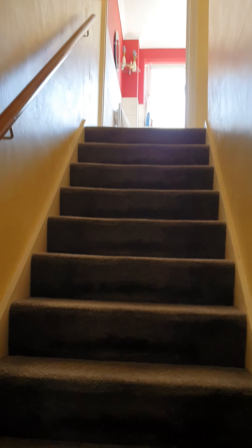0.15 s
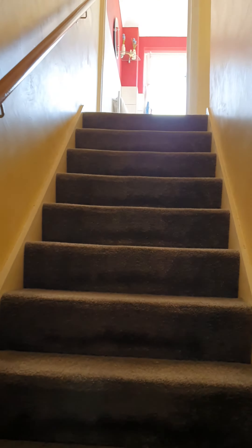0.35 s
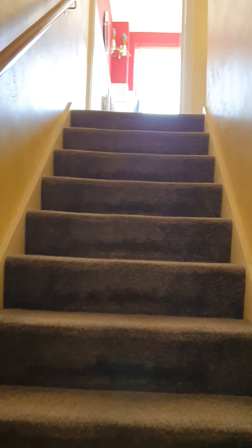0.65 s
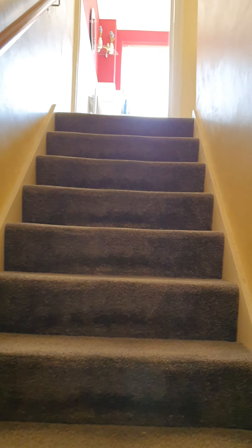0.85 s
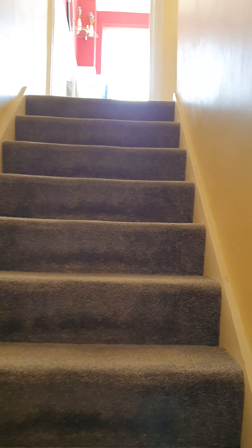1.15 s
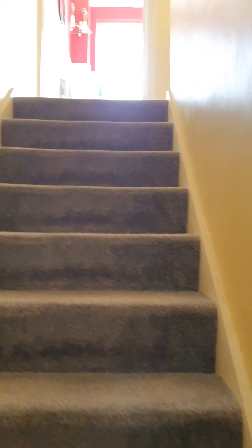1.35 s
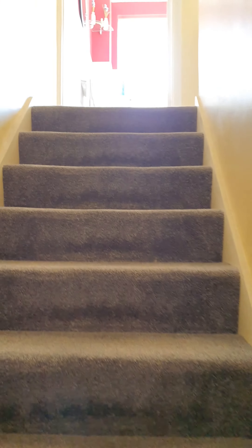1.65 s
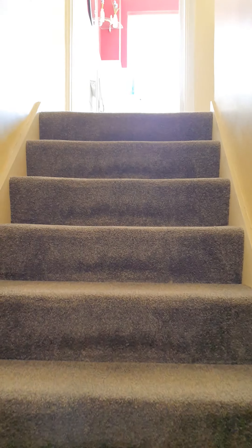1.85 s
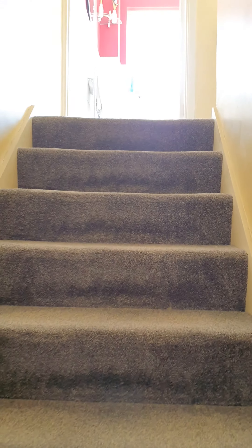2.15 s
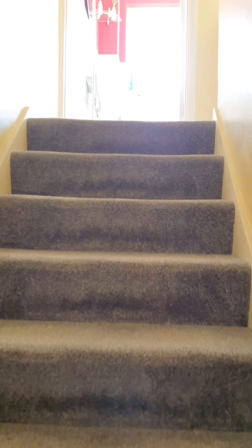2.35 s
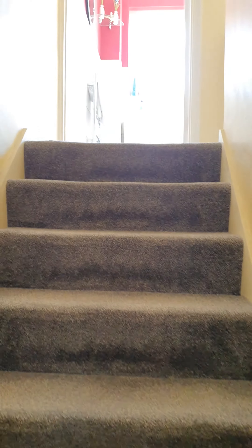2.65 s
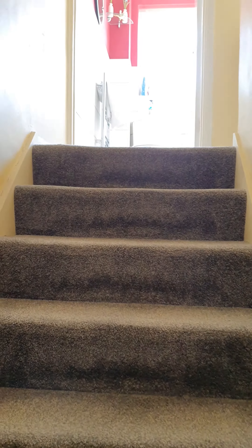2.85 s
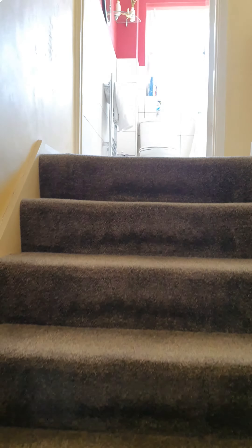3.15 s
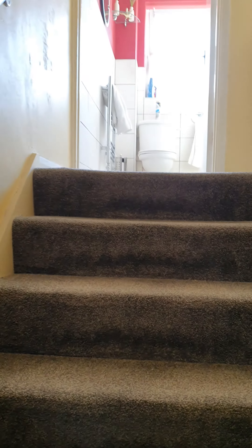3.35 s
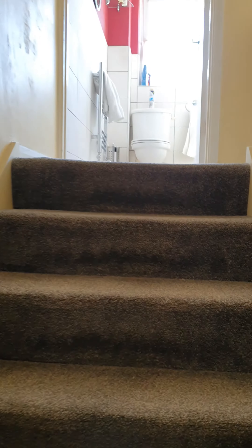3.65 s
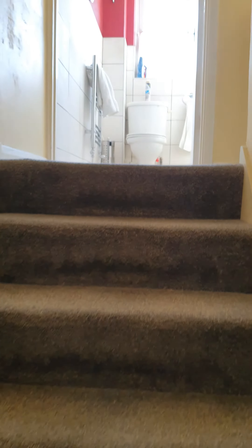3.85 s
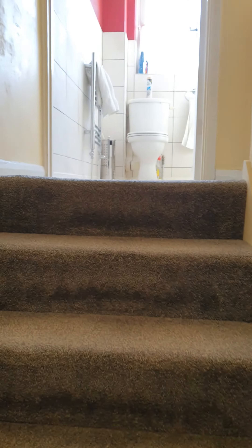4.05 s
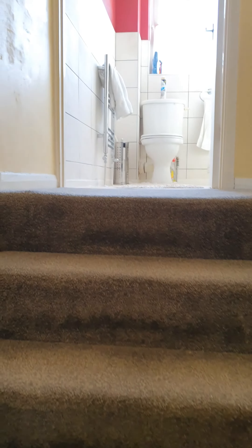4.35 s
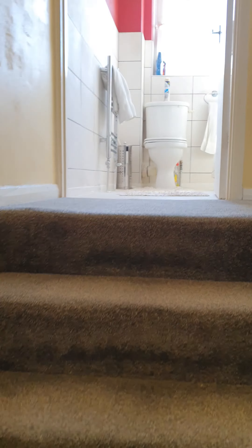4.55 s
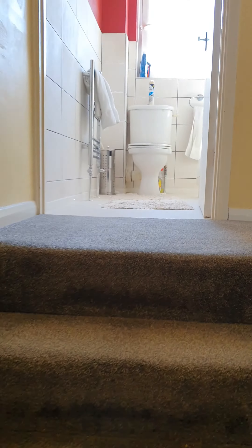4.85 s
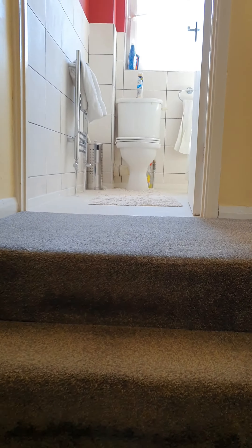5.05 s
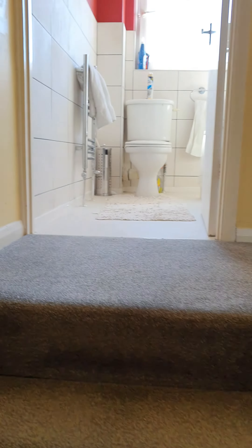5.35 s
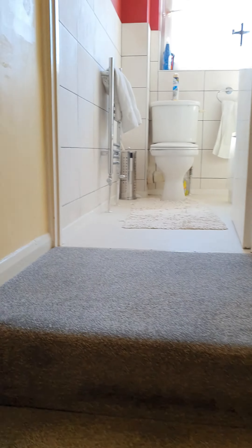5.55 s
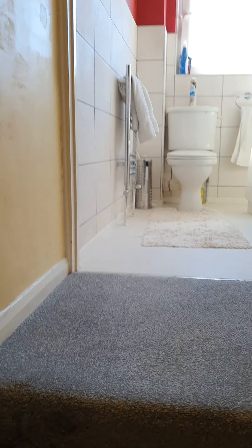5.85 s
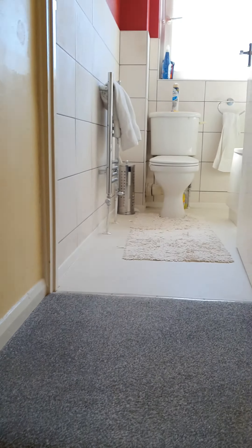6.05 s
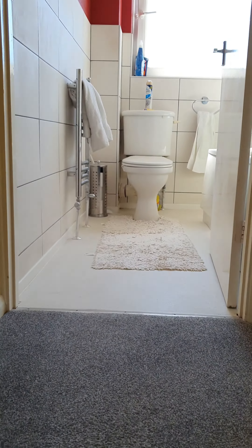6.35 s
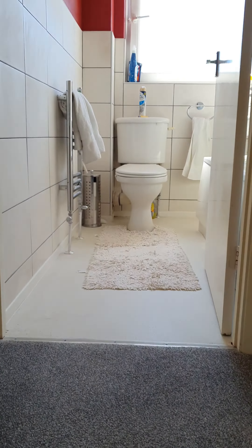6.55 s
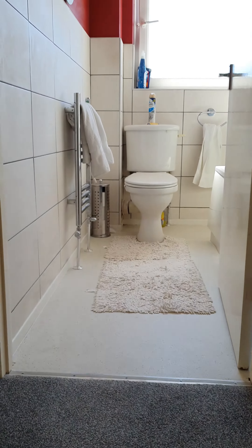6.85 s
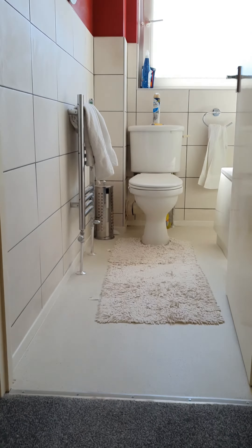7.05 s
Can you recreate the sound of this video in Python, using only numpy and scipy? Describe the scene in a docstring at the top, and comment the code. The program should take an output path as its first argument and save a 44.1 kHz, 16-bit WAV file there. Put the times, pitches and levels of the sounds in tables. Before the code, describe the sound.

Footsteps climb a carpeted wooden staircase, heard close from a microphone in the climber's hand, over the faint hush of a house. After a very soft step at about 0.3 seconds, the woodwork gives a quick crackling creak around 1 second. Dull, booming thuds then follow roughly every 0.6 to 0.7 seconds, often as a double knock of toe and heel on a hollow tread. They fall near 1.1, 1.8, 2.3, 3, 3.7, 4.4, 5.2, 5.7, 6.3 and 7 seconds, the heaviest at 3.7. Small handling bumps and clicks come between 1 and 3 seconds. Wooden joints tick now and then, with sharper cracks near 3.5, 5.2 and 6.4 seconds. A sole briefly scuffs the carpet at about 5 seconds and again at 6. The narrow stairwell adds a short echo, and clothes rustle faintly underneath.

```python
"""Climbing carpeted wooden stairs

A narrow stairwell, heard in stereo from a phone in the climber's hand. Underfoot, body weight
booms in the low modes of the stairs, toes and heels knock the treads, joints tick, and soles scuff
and rub the pile. Small clicks and jolts come from the grip, right at the microphones.
The walls give a short echo, and the hush of the house lies under it all."""
import sys
import numpy as np
from scipy import signal
from scipy.fft import rfft, irfft
from scipy.io import wavfile
from scipy.ndimage import uniform_filter1d

SR = 44100
rng = np.random.default_rng(int(sys.argv[2]) if len(sys.argv) > 2 else 0)


def digitize_waveform(pressure):
    """Quantize a signal to 16-bit integers and store it at the path in sys.argv[1].

    Rows of a 2-D input are taken as channels; values are limited to [-1, 1].
    """
    field = np.atleast_2d(pressure).T
    bounded = np.clip(field, -1, 1)
    quanta = np.round(bounded * 32767).astype(np.int16)
    wavfile.write(sys.argv[1], SR, quanta)


N = 317900

# room tone of the house and moving clothes: t/s, level below 1.8 kHz/dB, treble level/dB
HUSH_LEVELS = [(0, -65.5, -61.5), (.1, -70.5, -66.5), (.16, -70.5, -73), (.3, -65, -79), (.42, -66, -73.5),
               (.5, -63.5, -68.5), (.6, -71, -72), (.7, -60.5, -64.5), (.8, -65.5, -71),
               (.98, -65.5, -63.5), (1.28, -68.5, -70.5), (1.9, -68.5, -67.5), (2.8, -66, -70.5),
               (3.03, -63.5, -73), (3.29, -65.5, -67.5), (3.81, -64.5, -71.5), (4.18, -63.5, -68),
               (4.52, -58.5, -72), (4.8, -67, -68), (5.5, -61, -66.5), (5.86, -64.5, -70),
               (6.502, -64, -65.5), (6.95, -68, -68), (7.21, -58, -67.5)]
# spectrum of that room tone: f/Hz, level/dB
HUSH_SPECTRUM = [(80, -14), (150, -12), (230, -2.5), (450, -3.5), (900, -7), (1400, -11), (2600, -18.5),
                 (5000, -23), (7200, -22.5), (8300, -33.5), (11000, -32), (15600, -44)]
# spectrum of the house rumble: f/Hz, level/dB
RUMBLE_SPECTRUM = [(15, -43.5), (40, -2), (59, -2), (105, -8.5), (119, -47.5), (160, -22), (210, -83)]
# soft rubbing and creaking: t/s, length/s, level/dB, f/Hz, width/Hz
SOFT_RUBS = [(0.0, 0.047, -68, 2400, 1840), (0.265, 0.28, -65, 1300, 298), (0.884, 0.044, -60, 1090, 450),
             (0.905, 0.11, -65, 2350, 450), (0.973, 0.045, -57, 1750, 800), (1.16, 0.082, -64, 1280, 500),
             (2.09, 0.038, -67, 2300, 300), (3.355, 0.17, -66.5, 2530, 345),
             (4.957, 0.056, -52.5, 2520, 353), (4.966, 0.034, -58, 3300, 600),
             (6.04, 0.044, -60, 2750, 400), (6.682, 0.11, -66, 1130, 1500)]
# weight landing on a stair: t/s, boom level/dB, boom f/Hz, frame level/dB, riser level/dB
LANDINGS = [(0.284, -49.5, 61.7, -66, -73), (1.147, -39.5, 50.2, -47.5, -47.5),
            (1.262, -54, 44, -44.5, -61), (1.728, -34, 81.5, -42, -40.5), (1.848, -38.5, 76, -43, -39),
            (2.282, -33, 63, -41, -47), (2.314, -34, 68.4, -35, -40), (2.414, -44.5, 79, -40, -53),
            (2.798, -43.5, 64, -56, -45.5), (2.966, -30, 63.5, -50, -51), (3.047, -39.5, 56.1, -35.5, -47),
            (3.139, -40.5, 89, -38.5, -36.5), (3.686, -21.5, 67.8, -24, -52), (3.748, -35, 55, -30.5, -48),
            (3.905, -42, 61.6, -60, -47), (4.269, -45, 78, -60, -50.5), (4.376, -26, 63.2, -31.5, -44.5),
            (4.47, -37.5, 57, -57, -40), (4.579, -39.5, 78.6, -42.5, -44.5), (5.032, -41.5, 64.7, -35, -58),
            (5.209, -34, 73.4, -63, -39.5), (5.663, -27, 81.2, -31, -41.5),
            (5.806, -38.5, 72.3, -37, -43.5), (6.304, -38, 72.2, -39, -46), (6.374, -34, 59.4, -25.5, -47),
            (6.978, -35.5, 67.7, -40.5, -48), (7.038, -37, 52, -42, -37.5)]
# toe or heel on a tread: t/s, push level/dB, hollow re push/dB, slap re push/dB, rise/s
FOOT_KNOCKS = [(0.274, -88.5, 22, 26, 0.0014), (1.146, -56, -9, -0.5, 0.0066),
               (1.726, -63.5, 11.5, -2, 0.0044), (1.852, -33.5, 3.5, -8, 0.0019),
               (1.89, -53, 6.5, -18, 0.004), (1.961, -60.5, 1, -27, 0.011), (2.279, -63.5, 10, 3.5, 0.013),
               (2.316, -42, -9, -9.5, 0.002), (2.342, -56.5, 0, -19, 0.003),
               (2.489, -50.5, -8, -34, 0.0013), (2.52, -47.5, 0.5, -13, 0.0011),
               (2.798, -45, 2.5, -8, 0.0022), (2.827, -47.5, 5.5, -13, 0.0014),
               (3.009, -55.5, 8, -18, 0.003), (3.122, -53, 2.5, -16, 0.013), (3.159, -53, 4, -4, 0.011),
               (3.583, -44, -11, -3.5, 0.00048), (3.682, -55, 6, -4.5, 0.011),
               (3.747, -51.5, 2.5, -6, 0.011), (3.81, -67, 23.5, -20, 0.013), (3.901, -52.5, 7, -14, 0.018),
               (4.065, -63.5, 9.5, -15, 0.0015), (4.21, -56.5, -7, 3, 0.001),
               (4.272, -53, 4.5, -12, 0.0023), (4.384, -63.5, 12.5, -5, 0.0086),
               (4.434, -58, 11, -24, 0.022), (4.481, -53, 9, -18, 0.015), (4.639, -57, 1, -10, 0.0065),
               (5.074, -73, 18, 6, 0.016), (5.208, -42, 4.5, -7.5, 0.0011), (5.219, -46, 4.5, -3, 0.00091),
               (5.617, -56.5, -2, -6, 0.0075), (5.668, -60, 10, 2.5, 0.0084),
               (5.801, -76, 23.5, -18, 0.013), (5.867, -46, -6, -7.5, 0.0059),
               (6.297, -60.5, 6.5, -1, 0.0089), (6.361, -50.5, -1.5, -1.5, 0.0015),
               (6.954, -59.5, 0, -4, 0.011), (6.987, -53.5, -1, -2, 0.0029), (7.064, -45.5, 8, -11, 0.0076),
               (7.098, -49.5, 11, -26, 0.0091), (7.199, -52.5, 22.5, 3.5, 0.011)]
# resonances of a tread: f/Hz, width/Hz, gain/dB
TREAD_MODES = [(198, 33, -3.5), (220.6, 5, 11), (319, 32, 1.5), (403, 26, 5), (463, 16, 0), (715, 73, -3),
               (990, 9.8, -22)]
# spectrum of the push through the carpet: f/Hz, level/dB
PUSH_SPECTRUM = [(70, -10.5), (150, 0), (230, -2), (330, -3), (550, 1.5), (1000, -9), (1600, -21.5),
                 (3000, -49.5)]
# spectrum of a sole slapping the pile: f/Hz, level/dB
SLAP_SPECTRUM = [(600, -47.5), (1200, 12), (3000, -2.5), (5000, -15.5), (7500, -15), (8500, -34),
                 (15000, -35)]
# joints slipping in the woodwork: t/s, peak level/dB, f/Hz, width as a share of f
JOINT_TICKS = [(0.9065, -55, 2380, 0.23), (0.9413, -52, 2140, 0.29), (0.9814, -38.5, 2020, 0.43),
               (0.9967, -35, 1930, 0.5), (1.0244, -40.5, 1720, 0.5), (1.095, -49, 1870, 0.19),
               (2.146, -43.5, 1825, 0.23), (2.9213, -49, 3970, 0.18), (3.3921, -43.5, 1970, 0.48),
               (3.465, -39.5, 2100, 0.42), (3.7194, -39, 1470, 0.79), (4.4902, -48, 1490, 0.65),
               (4.794, -51, 2090, 0.4), (5.2066, -33.5, 3500, 0.85), (5.313, -47.5, 1670, 0.53),
               (6.3613, -36.5, 2650, 0.68), (6.99, -38.5, 2450, 0.66)]
# handling jolts on the phone: t/s, level/dB, rise/s, t60/s, left re right/dB
GRIP_JOLTS = [(1.1478, -36, .00012, .004, -11), (1.8028, -33.5, .00001, .03, 0)]
# clicks close to the microphones: t/s, level/dB, body re click/dB, top re click/dB, t60/s,
# left re right/dB
GRIP_CLICKS = [(2.488, -64, -3, -9, 0.018, -15), (2.513, -55, -18, -4, 0.017, -7.5),
               (2.5726, -60.5, 0, -18, .03, -11), (2.794, -56, -3, -2, 0.018, -10.5),
               (2.823, -54, 3, 2, 0.015, -2.5), (2.882, -57, 2.5, -24, 0.035, -6),
               (2.921, -62, 9, 13, 0.0062, -16.5), (5.2055, -47.5, -2.5, -25, 0.034, 2),
               (6.397, -59, -1.5, 1, 0.15, 3)]
# spectrum of those clicks: f/Hz, level/dB
CLICK_SPECTRUM = [(2000, -25), (3500, -3), (5200, -7), (7000, 0), (8500, -12), (11500, -13), (15600, -31)]
# soles dragging on the pile: t/s, level/dB, low part re drag/dB, attack/s, hold/s, fade/(dB per s)
SOLE_DRAGS = [(4.942, -48, -9, 0.03, 0.018, 330), (5.018, -55, -3.5, 0.014, 0.023, 128),
              (6.038, -51.5, -2, 0.046, 0.045, 300)]
# spectrum of a drag: f/Hz, level/dB
DRAG_SPECTRUM = [(150, -7.5), (350, 2), (800, -5.5), (1600, -5.5), (2500, -9), (4200, -10), (6000, -17),
                 (8000, -27), (15600, -42)]
# decay of the stairwell by band: f/Hz, t60/s
ROOM_DECAY = [(125, 0.52), (250, 0.54), (500, 0.14), (1000, 0.19), (2000, 0.029), (4000, 0.2), (8000, 0.09)]
# response of the left microphone, which faces away: f/Hz, gain/dB
LEFT_MIC_RESPONSE = [(100, -.5), (500, -1.5), (2000, -3), (4000, -8), (8000, -9), (14000, -5)]
SIDES = np.array([[1], [-1]])  # left, right


def undb(db):
    """Decibels to amplitude."""
    return 10 ** (np.asarray(db) / 20)


def unit(x):
    """Scale to rms 1."""
    return x / np.sqrt(np.mean(x ** 2))


def colour(x, points):
    """Shape x by (f/Hz, gain/dB) points."""
    hz, db = np.transpose(points)
    f = np.arange(x.shape[-1] // 2 + 1) * SR / x.shape[-1] + 1
    gain = undb(np.interp(np.log(f), np.log(hz), db))
    return irfft(rfft(x) * gain, x.shape[-1])


def band(x, hz, width_hz):
    """One resonance driven by x."""
    return signal.lfilter(*signal.iirpeak(hz, hz / width_hz, SR), x)


def split(x, hz):
    """The parts of x below and above hz."""
    low = signal.sosfiltfilt(signal.butter(3, hz, fs=SR, output="sos"), x)
    return low, x - low


def noise(points, alike_hz):
    """Coloured stereo noise, rms 1, alike at both microphones below alike_hz."""
    mid, side = rng.standard_normal((2, N))
    side = signal.sosfilt(signal.butter(1, alike_hz, "high", fs=SR, output="sos"), side)
    return unit(colour(mid + SIDES * side, points))


def walk(rate):
    """Glide to a new random level every 1 / rate s; rms 1."""
    hold = int(SR / rate)
    levels = np.repeat(rng.standard_normal(N // hold + 3), hold)
    return unit(uniform_filter1d(levels, hold)[hold:hold + N])


def swell(rise, t60):
    """Times and an envelope that rises, then dies away; peak 1."""
    t60 = max(t60, .002)
    t = np.arange(int((t60 + 4 * rise) * SR)) / SR
    env = (1 - np.exp(-t / rise)) ** 2 * np.exp(-np.log(1000) * t / t60)
    return t, env / env.max()


def add(out, s, x):
    """Mix x into out at s seconds."""
    i = int(s * SR)
    out[..., i:i + x.shape[-1]] += x[..., :N - i]


def late(x, s):
    """Delay x by s seconds."""
    return np.pad(x, (round(s * SR), 0))[:N]


def pan(db):
    """Stereo gains with the left db above the right."""
    return undb(SIDES * db / 2)


def house_hush():
    """Room tone: a low wash and a thin rustle waver separately over the rumble of the house."""
    s, low_db, high_db = np.transpose(HUSH_LEVELS)
    t = np.arange(N) / SR
    hiss = noise(HUSH_SPECTRUM, alike_hz=260)
    low = signal.sosfiltfilt(signal.butter(2, 1800, fs=SR, output="sos"), hiss)
    wash = undb(np.interp(t, s, low_db) + 2 * walk(40)) * unit(low)
    rustle = undb(np.interp(t, s, high_db) + 1.3 * walk(25)) * unit(hiss - low)
    rumble = undb(-59.5 + 3.3 * walk(6.1)) * noise(RUMBLE_SPECTRUM, alike_hz=410)
    return wash + rustle + rumble


def rubs_and_creaks():
    """Rough slipping heard through one resonance, fading in and out."""
    out = np.zeros(N)
    grain = undb(2.1 * walk(150)) * rng.standard_normal(N)
    for s, length, db, hz, width in SOFT_RUBS:
        t = np.arange(int(length * SR)) / SR
        friction = grain[int(s * SR):][:len(t)]
        ring = band(band(friction, hz, width), hz, width)
        arch = np.sin(np.pi * t / length) ** 0.97
        add(out, s, undb(db) * arch * unit(ring))
    return out


def stair_booms(landing_s=0.0342, frame_hz=32.5, riser_hz=108.3):
    """Each landing rings three low modes of the stairs: the main boom, the frame and the riser."""
    out = np.zeros(N)
    detunes = rng.standard_normal((len(LANDINGS), 2))
    for (s, boom_db, boom_hz, frame_db, riser_db), detune in zip(LANDINGS, detunes):
        boom = (boom_hz, boom_db, landing_s, 0.23)
        frame = (frame_hz * (1 + 0.07 * detune[0]), frame_db, 0.94 * landing_s, 0.42)
        riser = (riser_hz * (1 + 0.018 * detune[1]), riser_db, 0.33 * landing_s, 0.32)
        for hz, db, rise, t60 in (boom, frame, riser):
            t, env = swell(rise, t60)
            add(out, s - 0.408 * landing_s, undb(db) * env * np.sin(2 * np.pi * hz * t))
    # the microphones sit apart, so the boom reaches the left one later
    return np.array([late(out, 0.00033), out])


def tread_knocks(shortest_swing_s=0.0044):
    """A rough push through the carpet punches and rings the tread; the sole slaps the pile on top.
    Gives the rough part, which fills the stairwell, and the swing and ring of the wood underfoot."""
    push, hollow, slap, punch = np.zeros((4, N))
    for s, db, hollow_db, slap_db, rise in FOOT_KNOCKS:
        # the tread first makes a single swing, longer and weaker under a soft step
        phase = np.linspace(0, 1, int((shortest_swing_s + 0.77 * rise) * SR))
        swing = np.sin(2 * np.pi * phase) * np.sin(np.pi * phase) * 2 * phase
        hardness = shortest_swing_s / (shortest_swing_s + rise)
        add(punch, s, undb(db + hollow_db + 7.5) * hardness * swing)
        push_start = s + 0.22 * rise
        t60 = 0.042 + 4.7 * rise  # a softer step pushes longer
        env = swell(rise, t60)[1]
        add(push, push_start, undb(db) * env)
        add(hollow, push_start, undb(db + hollow_db) * env)
        add(slap, s, undb(db + slap_db) * swell(.5 * rise, 0.73 * t60)[1])
    # the space under the tread takes the low part of the push
    low, high = split(noise(PUSH_SPECTRUM, alike_hz=820), hz=332)
    rough = hollow * unit(low) + push * unit(high)
    rings = sum(undb(db) * band(rough + punch, hz, width) for hz, width, db in TREAD_MODES)
    return rough + slap * noise(SLAP_SPECTRUM, alike_hz=700), punch + rings


def joint_ticks():
    """A slipping joint rings one patch of the wood, narrow for a tick and wide for a crack."""
    out = np.zeros(N)
    grain = undb(2.5 * walk(400)) * rng.standard_normal(N)
    for s, db, hz, share in JOINT_TICKS:
        cycles = 36 / np.sqrt(share)  # a wide crack is over sooner
        env = np.pad(swell(rise=.0003, t60=cycles / hz)[1], (0, 512))
        slip = env * grain[int(s * SR):][:len(env)]
        width = share * hz
        ring = band(band(slip, hz, width), hz, width)
        add(out, s, undb(db) * ring / np.abs(ring).max())
    return out


def grip_jolts():
    """Handling noise: the grip jolts the phone, a step in pressure that leaks away with no echo."""
    out = np.zeros((2, N))
    for s, db, rise, t60, pan_db in GRIP_JOLTS:
        add(out, s, undb(db) * pan(pan_db) * swell(rise, t60)[1])
    return out


def joint_squeak(start_s=1.313, length_s=.05, from_hz=2700, to_hz=2950):
    """One slipping joint gives a faint, unsteady squeak that glides upward."""
    out = np.zeros(N)
    t = np.arange(int(length_s * SR)) / SR
    flutter = 1 + 0.5 * walk(300)[:len(t)]
    arch = np.sin(np.pi * np.sqrt(t / length_s)) ** 0.23
    add(out, start_s, undb(-65) * flutter * arch * signal.chirp(t, from_hz, length_s, to_hz))
    return out


def grip_clicks():
    """Broad snaps close to the microphones, with a duller body; some reach into the top octave."""
    snap, top, body = np.zeros((3, 2, N))
    for s, db, body_db, top_db, t60, pan_db in GRIP_CLICKS:
        env = pan(pan_db) * undb(db) * swell(rise=0.00071, t60=t60)[1]
        add(snap, s, env)
        add(top, s, undb(top_db) * env)
        add(body, s, undb(body_db) * env)
    dull = unit(band(rng.standard_normal(N), hz=650, width_hz=1300))
    below, above = split(noise(CLICK_SPECTRUM, alike_hz=2800), hz=8400)
    return snap * below + top * above + body * dull


def carpet_scuffs():
    """Fibres slip in dense uneven grains: the drag bites, holds and fades as the sole lifts."""
    t = np.arange(N) / SR
    high_env, low_env = np.zeros((2, N))
    for s, db, low_db, attack, hold, fade in SOLE_DRAGS:
        rise_db = -22 * np.clip(1 - (t - s) / attack, 0, None) ** 2
        fade_db = fade * np.clip(t - s - attack - hold, 0, None)
        drag = (t > s) * undb(db + rise_db - fade_db)
        high_env += drag
        low_env += undb(low_db) * drag
    low, high = split(noise(DRAG_SPECTRUM, alike_hz=700), hz=1770)
    grain = undb(1.5 * walk(300))
    return grain * (low_env * low + high_env * high)


def stairwell(x, build_s=0.0045):
    """Dense echoes off the near walls, dying away band by band."""
    t = np.arange(SR // 2) / SR
    tail = 0
    for hz, t60 in ROOM_DECAY:
        mid, side = rng.standard_normal((2, len(t)))
        echoes = mid + min(hz / 900, 1) * SIDES * side  # bass is nearly alike at both microphones
        decay = np.exp(-np.log(1000) * t / t60) / np.sqrt(t60)
        tail = tail + band(echoes, hz, 0.98 * hz) * decay
    tail *= np.minimum(t / build_s, 1)
    tail /= np.sqrt(np.sum(tail ** 2) / 2)
    return signal.fftconvolve(x, tail, axes=1)[:, :N]


def scene():
    """The climb as it reaches the hand; booms and ringing wood come direct, without echo."""
    rough, wood = tread_knocks()
    steps = rough + carpet_scuffs()
    small_sounds = joint_ticks() + joint_squeak() + grip_clicks() + rubs_and_creaks()
    direct = stair_booms() + wood + steps + small_sounds
    echo = stairwell(steps + undb(-4.5) * small_sounds)
    return direct + echo + house_hush()


def record(dry):
    """Handheld phone: the left microphone faces away, later and duller; jolts come through the case."""
    dulled = colour(np.pad(dry[0], (0, N // 10)), LEFT_MIC_RESPONSE)[:N]
    heard = np.array([late(dulled, .00045), dry[1]]) + grip_jolts()
    top_cut = signal.ellip(8, .2, 70, 15700, fs=SR, output="sos")  # steep low-pass at 15.7 kHz
    return signal.sosfilt(top_cut, heard)


dry = scene()
out = record(dry)
digitize_waveform(out)
```